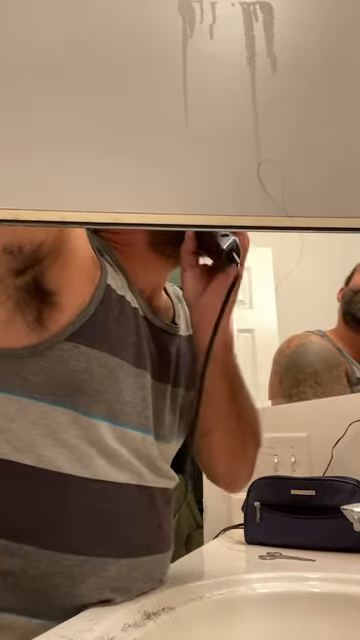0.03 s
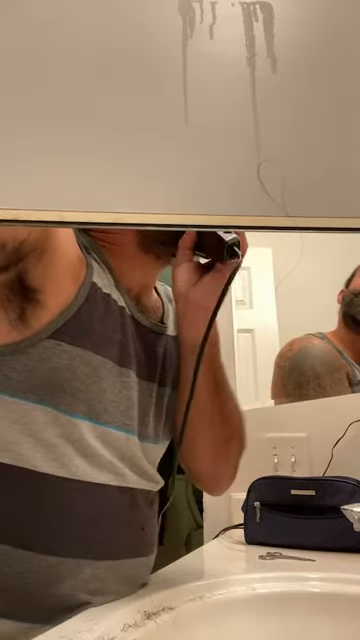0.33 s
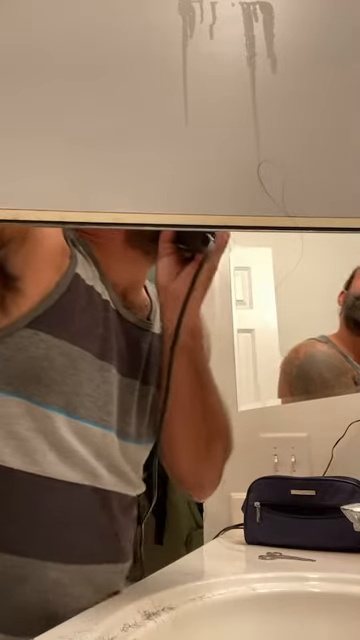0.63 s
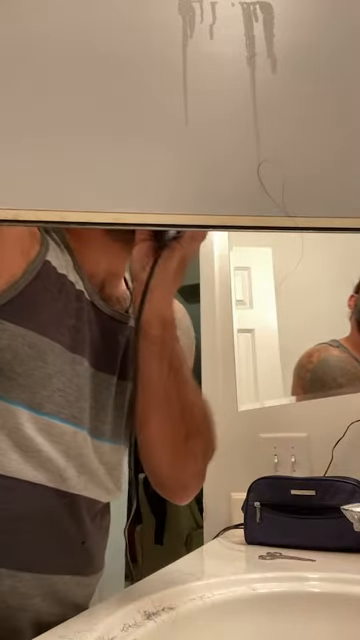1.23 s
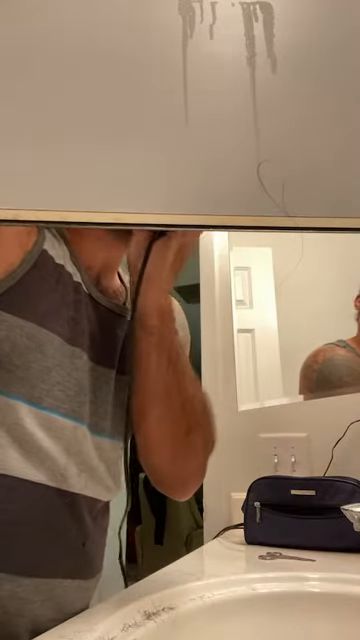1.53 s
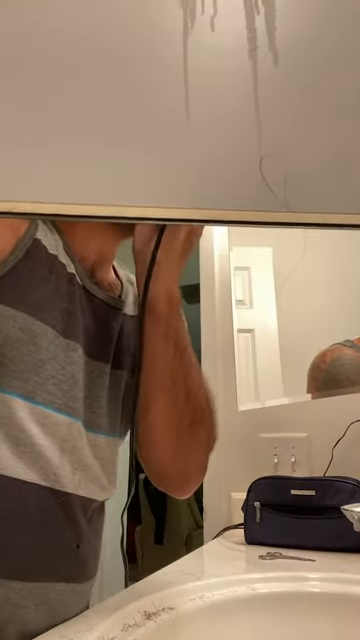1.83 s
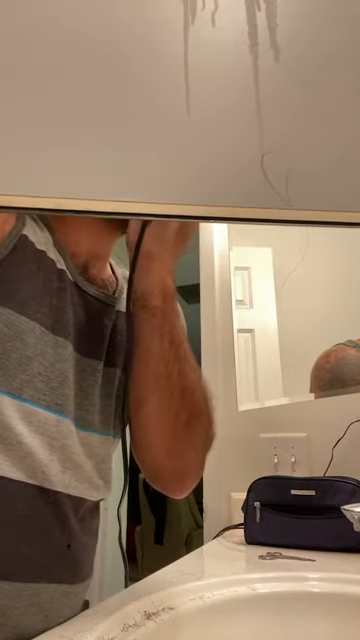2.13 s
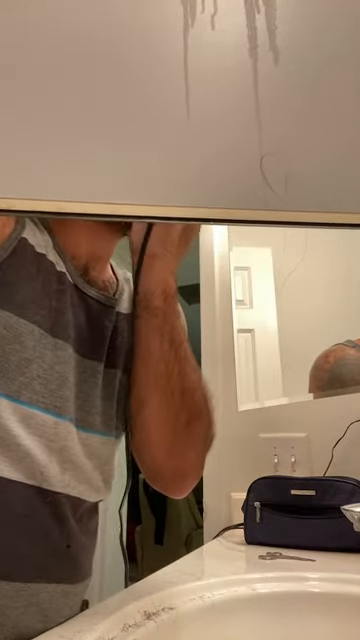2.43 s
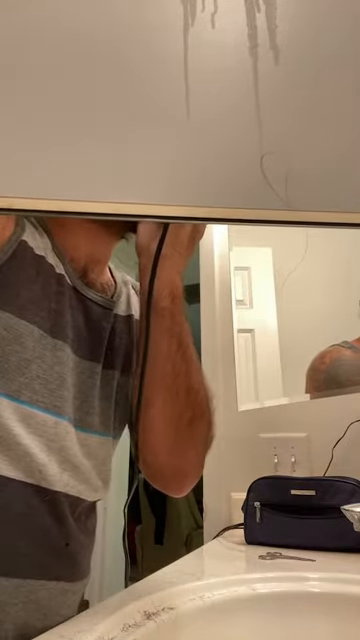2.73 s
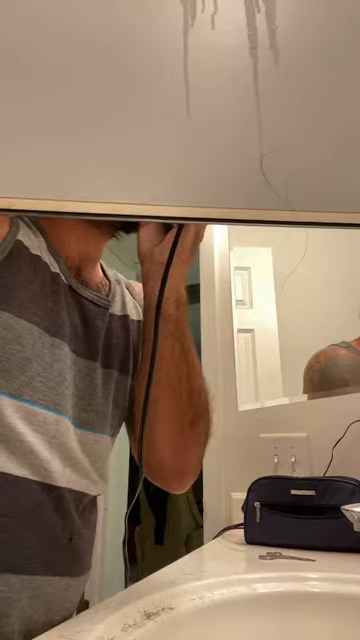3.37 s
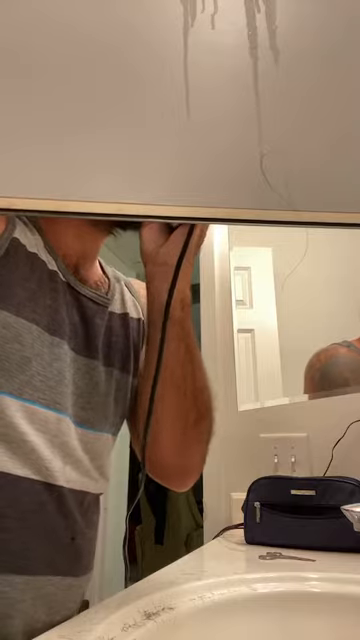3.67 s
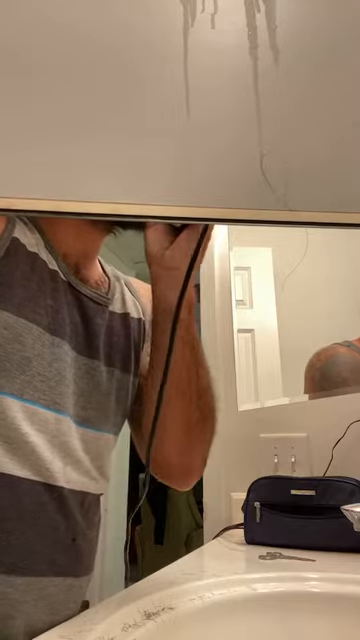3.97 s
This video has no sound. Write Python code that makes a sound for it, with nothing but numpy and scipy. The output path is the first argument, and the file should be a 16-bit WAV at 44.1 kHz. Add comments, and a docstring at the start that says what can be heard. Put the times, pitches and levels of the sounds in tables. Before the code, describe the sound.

An electric beard trimmer buzzes steadily, then crackles through hair in a small bathroom.

```python
"""A corded beard trimmer buzzes in a small tiled bathroom; its armature swings at twice the mains rate
and the blade ticks at both ends of each swing. The tone shifts as the hand brings it from in front of
the face past the chin (0.7 s) and cheek (1.2 s) into the beard (2 s). There the blades snip hairs on
every stroke: a crackle that rings the case and swells at each thick tuft. From about 2.5 s the blades,
pressed on the skin, also sizzle. Faint room rumble and hiss lie under it all."""
import sys
import numpy as np
from scipy import signal
from scipy.fft import rfft, irfft
from scipy.io import wavfile
from scipy.ndimage import map_coordinates

SR = 44100
rng = np.random.default_rng(int(sys.argv[2]) if len(sys.argv) > 2 else 0)


def unload_audio(sound):
    """Save the sound as a 16-bit wav file, at the path given as the first command line argument."""
    columns = np.transpose(np.atleast_2d(sound))
    # keep every value between -1 and 1, then stretch to whole-number steps
    steps = np.round(np.clip(columns, -1, 1) * 32767)
    wavfile.write(sys.argv[1], SR, steps.astype(np.int16))


N = 176400
STROKE_HZ = 119.958

# Tone of the buzz in four places, played from harmonic 3 up: harmonic, level_db
TONE_IN_FRONT = [(1, -6), (2, -36), (3, -19), (4, -23), (5, -18), (6, -26), (7, -31), (8, -23.5), (9, -35),
                 (10, -19.5), (11, -5), (12, -18), (13, -18), (14, -13.5), (15, -15), (16, -11), (17, -6),
                 (18, -19), (19, -16), (20, -6), (21, 0.5), (22, -14), (23, -2.5), (24, -21), (25, -18)]
TONE_AT_CHIN = [(1, -1), (2, -32), (3, -14.5), (4, -20), (5, -12), (6, -18.5), (7, -16), (8, -21.5),
                (9, -10.5), (10, -14), (11, -5), (12, -24), (13, -1), (14, -10), (15, -9.5), (16, -21),
                (17, -8.5), (18, -8), (19, -10.5), (20, -9.5), (21, 0.5), (22, -11), (23, -2.5), (24, -16),
                (25, -17)]
TONE_AT_CHEEK = [(1, -3), (2, -36), (3, -12.5), (4, -23), (5, -12), (6, -21.5), (7, -27), (8, -27),
                 (9, -4.5), (10, -13.5), (11, -6), (12, -19), (13, -2.5), (14, -16.5), (15, -6.5),
                 (16, -19.5), (17, -8.5), (18, -14), (19, -11), (20, -11), (21, 1), (22, -11), (23, -9.5),
                 (24, -17), (25, -7)]
TONE_IN_BEARD = [(1, 0), (2, -17), (3, -16.5), (4, -25.5), (5, -4.5), (6, -21), (7, -19), (8, -22),
                 (9, -2.5), (10, -13.5), (11, -8), (12, -13.5), (13, -7.5), (14, -28.5), (15, -7.5),
                 (16, -19), (17, -14.5), (18, -50), (19, -8), (20, -3.5), (21, -3.5), (22, -9.5),
                 (23, -12.5), (24, -38), (25, -8)]
# Fader for each of those tones: gain_db
TONE_GAINS = [-42, -44, -43, -44.5]
# Path of the hand: time_s, place (0 in front, 1 chin, 2 cheek, 3 beard)
HAND_PATH = [(0, 0.11), (.42, 0), (.65, 1), (.85, 1), (1.15, 2), (1.55, 2), (1.95, 3), (2.6, 2.5), (4, 3)]
# Level ride of the fundamental hum: time_s, level_db
HUM_RIDE = [(0.03, -47.5), (0.39, -45), (1.25, -47), (1.82, -43.5), (2.69, -42.5), (3.17, -44),
            (3.95, -43.5)]
# Swells of the middle and the high harmonics: time_s, gain_db
MID_RIDE = [(0, 2.5), (.3, 1.5), (.62, -1.5), (.95, 2), (1.3, 2.5), (1.7, 0), (2.0, -0.5), (2.4, 2),
            (2.8, 0), (3.3, 3), (3.7, 3.5), (4, 0.5)]
HIGH_RIDE = [(0, 0), (.3, 1.5), (.6, -0.5), (.95, -3), (1.3, 0), (1.8, 1), (2.3, -3), (2.9, 2.5), (3.4, 2),
             (4, -0.5)]
MID_FROM_HZ, HIGH_FROM_HZ = 900, 1900


def armature_buzz(hop=100):
    """The armature hums with clean harmonics that drift with the hand and shake under cutting load."""
    place, mids, highs = (curve(rows)[0][::hop] for rows in (HAND_PATH, MID_RIDE, HIGH_RIDE))
    load = unit(amp(curve(CUTTING_RIDE)[0][::hop]))
    tones = (TONE_IN_FRONT, TONE_AT_CHIN, TONE_AT_CHEEK, TONE_IN_BEARD)
    gains = np.array([amp(np.array(rows)[:, 1] + db) for rows, db in zip(tones, TONE_GAINS)])
    swing, samples = np.exp(2j * np.pi * strokes()), np.arange(N)
    steps, top = len(place), gains.shape[1]
    out = amp(curve(HUM_RIDE)[0]) * swing.imag
    for k in range(3, top + 1):  # the second harmonic is silent
        hz, height = k * STROKE_HZ, k / top  # higher harmonics waver more
        swell_db = highs if hz > HIGH_FROM_HZ else mids if hz > MID_FROM_HZ else 0
        drift_db = 1.45 * np.sqrt(height) * wander(steps, hz=2.82)
        shake_db = 1.5 * height * load * wander(steps, hz=24.91)
        level = np.interp(place, range(4), gains[:, k - 1]) * amp(swell_db + drift_db + shake_db)
        phase_turns = rng.random() + 0.22 * height * wander(steps, hz=1.478)
        envelope = np.interp(samples, samples[::hop], level * np.exp(2j * np.pi * phase_turns))
        out += (envelope * swing ** k).imag
    return np.sqrt(2) * out


# Cutting effort: time_s, rasp_db, ring_db, crackle_db
CUTTING_RIDE = [(0, -51, -54, -47.5), (.25, -54.5, -53, -53), (.5, -65, -66, -51), (1.05, -62, -60, -54.5),
                (1.68, -63, -51, -50), (1.85, -49.5, -47, -43.5), (2.0, -48.5, -50, -39.5),
                (2.2, -42, -44, -45.5), (2.4, -45.5, -38.5, -39), (2.62, -48.5, -44.5, -46),
                (2.85, -46, -42.5, -43.5), (3.0, -45.5, -46, -41), (3.2, -49.5, -49, -42.5),
                (3.3, -44, -38.5, -42), (3.47, -40.5, -49, -39), (3.58, -47.5, -42, -45.5),
                (3.72, -44, -41.5, -43.5), (3.85, -39, -49, -42.5), (4, -37, -38, -43)]
# Tufts caught by the blades: start_s, length_s, crackle_db, ring_db, fizz_db
TUFT_HITS = [(0.146, 0.0098, -40, -55, -46), (0.201, 0.01, -37.5, -55, -43), (1.188, 0.0085, -41, -58, -50),
             (1.768, 0.03, -48, -42, -49), (1.845, .015, -37, -57, -44), (1.869, 0.026, -35, -36, -41),
             (1.995, 0.019, -39.5, -37.5, -53), (2.05, 0.024, -39, -53, -44),
             (2.073, 0.032, -33, -33.5, -54), (2.161, 0.047, -40, -38.5, -47),
             (2.219, 0.022, -36.5, -36.5, -47), (2.293, 0.013, -35, -49, -37.5),
             (2.313, 0.027, -37.5, -54, -58), (2.415, 0.047, -47, -39.5, -52), (2.479, .01, -37, -43, -52),
             (2.521, 0.045, -36.5, -36, -55), (2.65, .02, -34, -37, -45), (2.701, 0.013, -43, -52, -47),
             (2.778, 0.015, -38.5, -39, -54), (2.828, .012, -47, -43, -48),
             (2.935, 0.0098, -30.5, -38, -49), (2.972, 0.028, -39, -35, -46),
             (3.004, 0.012, -33.5, -44, -42), (3.045, 0.009, -33, -25, -58), (3.139, 0.0089, -37, -49, -55),
             (3.238, 0.034, -38, -35.5, -48), (3.296, 0.032, -37, -38, -53),
             (3.393, 0.037, -46, -36.5, -48), (3.436, 0.017, -36, -28.5, -52),
             (3.499, 0.022, -36, -33.5, -56), (3.673, .015, -38, -37.5, -49),
             (3.756, 0.025, -39, -34.5, -62), (3.798, 0.0089, -43, -28, -56), (3.844, 0.016, -34, -29, -59),
             (3.898, 0.034, -38.5, -31.5, -61), (3.964, .012, -44, -34.5, -58)]
# Blades pressed on the skin: time_s, level_db
SIZZLE_RIDE = [(0, -75), (2.4, -59), (2.65, -48.5), (3.2, -51), (3.6, -44), (4, -44)]
# EQ of the low rasp, ringing case, hair crackle, fine fizz and skin sizzle: freq_hz, gain_db
RASP_EQ = [(150, -38.5), (400, -19), (455, -5), (540, -13), (660, 2.5), (770, -10), (870, -5.5),
           (1020, -9.5), (1160, 2), (1500, 3.5), (1800, -2.5), (2150, -6), (3000, -7.5), (4000, -12),
           (8000, -37.5)]
CASE_EQ = [(500, -45.5), (2050, -22.5), (2220, -23), (2320, 3.5), (2460, 4), (2590, -1.5), (2670, -6),
           (2830, -8.5), (3100, -17.5), (6000, -46.5)]
CRACKLE_EQ = [(300, -37), (2500, -9), (3900, -11.5), (4700, -5), (5300, -0.5), (7600, 2.5), (8600, -2),
              (9800, -10), (11800, -13), (13500, -15), (15700, -16.5)]
FIZZ_EQ = [(1000, -40), (6000, -12), (8500, 3), (11300, 8), (13000, -3), (15700, -7)]
SIZZLE_EQ = [(3000, -40), (5500, -14), (6100, 3.5), (6600, -30), (8600, -33), (9050, -2), (9500, -29),
             (12900, -8), (13300, -13), (13600, -15), (14000, -2), (14400, -18), (15700, -17)]


def cutting(attack_s=0.0049, release_s=0.002):
    """Blades rasp and crackle through hair, ring the case and sizzle on skin; tufts add short bursts."""
    t, tufts = np.arange(SR // 8) / SR, np.zeros((3, N + SR))
    for start_s, length_s, *levels_db in TUFT_HITS:
        burst = np.minimum(t / attack_s, 1) * np.exp(-np.maximum(t - length_s, 0) / release_s)
        at = round(start_s * SR)
        tufts[:, at:at + len(t)] += amp(levels_db)[:, None] * burst
    tuft_crackle, tuft_ring, tuft_fizz = tufts[:, :N]
    rasp, ring, crackle = amp(curve(CUTTING_RIDE))
    blades = snips(rasp, RASP_EQ, amp(-8.5) * tuft_ring, stroke_spread_db=2.5)
    blades += snips(crackle, CRACKLE_EQ, tuft_crackle, stroke_spread_db=2)
    blades += snips(tuft_fizz, FIZZ_EQ)
    blades += snips(amp(curve(SIZZLE_RIDE)[0]), SIZZLE_EQ)
    case = snips(ring, CASE_EQ, tuft_ring, stroke_spread_db=1.5)
    blades, case = np.pad([blades, case], ((0, 0), (0, SR // 2)))  # space for the reverb tail
    return (bathroom(blades, wet_db=-2) + bathroom(case, wet_db=2))[:N]


def snips(level, eq, tuft=0, stroke_spread_db=0, clicks_per_s=9000, click_spread_db=2.5):
    """Tiny clicks of parting hairs, loudest where the blades close; strokes can differ in strength."""
    turns = strokes() - 0.56 + 1  # the blades close 0.56 of the way through a stroke
    closing = 0.53 + np.exp(-(turns % 1) / 0.38)
    strength = unit(amp(stroke_spread_db * rng.standard_normal(1024)))[turns.astype(int)]
    clicks = (rng.random(N) < clicks_per_s / SR) * rng.choice([-1, 1], N)
    clicks = clicks * amp(click_spread_db * rng.standard_normal(N))
    return colour(np.hypot(level * strength, tuft) * unit(clicks * closing), eq)


# Bright EQ of the blade ticks: freq_hz, gain_db
TICK_EQ = [(200, -49), (2700, -34.5), (3150, 1.5), (4200, -4.5), (5600, -5.5), (6600, -3.5), (7200, 4),
           (8000, 3), (8800, -4), (10000, -10.5), (13700, -10.5), (15700, -19)]
# Level ride of the ticks: time_s, level_db
TICK_RIDE = [(0, -46), (.45, -42.5), (.8, -41.5), (1, -43), (1.25, -46.5), (1.6, -43), (2, -48), (3, -46),
             (4, -49.5)]


def blade_ticks(jitter_s=6e-6, spread_db=1.3, spots=11):
    """The blade ticks at both ends of its swing; the echoes change as the hand moves."""
    train, window = np.zeros(N), np.arange(-16, 17)
    cycles = np.arange(round(STROKE_HZ * N / SR))[:, None]
    for phase_turns, db in ((0.55, 0), (0.93, -3.5)):  # out, then back
        at = (cycles + phase_turns) * SR / STROKE_HZ + jitter_s * SR * rng.standard_normal(cycles.shape)
        index = at.astype(int) + window
        strength = amp(db + spread_db * rng.standard_normal(at.shape))
        train[index % N] += strength * np.sinc(index - at) * np.hanning(len(window))
    train = colour(train, TICK_EQ)
    position, out = np.linspace(0, spots - 1, N), np.zeros(N)
    for spot in range(spots):  # a fresh reverb for each spot the hand passes
        crossfade = np.sqrt(np.maximum(1 - abs(position - spot), 0))
        out += crossfade * unit(bathroom(train, wet_db=4.5))
    return amp(curve(TICK_RIDE)[0]) * unit(near_echoes(out))


# Early reflections of the ticks: delay_ms, gain_db
NEAR_SURFACES = [(0.698, -5), (1.298, -10), (2.1, -2.5), (2.999, -4.5)]


def near_echoes(x, sway_ms=0.097):
    """Face, hand and mirror add echoes whose paths change as the hand sways."""
    samples, out = np.arange(N), x.copy()
    for delay_ms, db in NEAR_SURFACES:
        sway = np.interp(samples, np.linspace(0, N, 1000), wander(1000, hz=2.194))
        lag = (delay_ms + sway_ms * sway) * SR / 1000
        out += amp(db) * np.interp(samples - lag, samples, x)
    return out


def bathroom(x, wet_db, low_t60_s=0.2, high_t60_s=0.34, split_hz=3900):
    """Direct sound plus a dense tail off the tiles, at unchanged power; the tail wraps round the end."""
    t, hz = np.arange(SR // 3) / SR, np.fft.rfftfreq(SR // 3, 1 / SR)
    noise = rng.standard_normal(len(t))
    low = irfft(rfft(noise) / (1 + (hz / split_hz) ** 2), len(t))
    tail = low * amp(-60 * t / low_t60_s) + (noise - low) * amp(-60 * t / high_t60_s)
    tail *= t > 0.002  # pre-delay
    taps = amp(wet_db) * tail / np.linalg.norm(tail)
    taps[0] = 1
    return irfft(rfft(x) * rfft(taps / np.linalg.norm(taps), len(x)), len(x))


# EQ of the room tone: freq_hz, gain_db
ROOM_TONE_EQ = [(20, -32), (32, -18), (42, 1), (60, -2), (72, -12), (130, -10), (210, -16.5), (500, -22),
                (1500, -24), (5000, -26.5), (15000, -50)]


def room_tone(level_db=-58.5):
    """Faint low rumble and hiss of the room."""
    gain = eq_gain(ROOM_TONE_EQ, np.fft.rfftfreq(N, 1 / SR))
    return amp(level_db) * unit(irfft(rfft(rng.standard_normal(N)) * gain, N))


def strokes():
    """Running count of armature strokes, sample by sample."""
    return STROKE_HZ * np.arange(N) / SR


def amp(db):
    """Decibels to gain."""
    return 10 ** (np.asarray(db) / 20)


def unit(x):
    """Scales to rms 1."""
    return x / np.sqrt(np.mean(x ** 2) + 1e-20)


def curve(rows):
    """Each column of an automation table, sample by sample."""
    time_s, *columns = np.transpose(rows)
    return [np.interp(np.arange(N) / SR, time_s, column) for column in columns]


def eq_gain(eq, hz):
    """Gain of an EQ curve drawn on a log-frequency axis."""
    freq_hz, gain_db = np.transpose(eq)
    return amp(np.interp(np.log(hz + 1), np.log(freq_hz + 1), gain_db))


def colour(x, eq, size=4096):
    """Applies an EQ curve as a minimum-phase filter of unit energy."""
    log_gain = np.log(eq_gain(eq, abs(np.fft.fftfreq(size, 1 / SR))))
    taps = np.fft.ifft(np.exp(signal.hilbert(log_gain).conj())).real[:size // 2]
    return signal.oaconvolve(x, taps / np.linalg.norm(taps))[:len(x)]


def wander(steps, hz):
    """Smooth random motion, rms near 1, that changes about hz times a second."""
    positions = np.linspace(0, hz * N / SR, steps)
    return map_coordinates(rng.standard_normal(512), [positions], order=3, mode="mirror")


def scene():
    """The trimmer in the bathroom, in mono."""
    return (armature_buzz() + blade_ticks() + cutting() + room_tone())[None]


def record(dry):
    """A steep high cut at 15.72 kHz."""
    high_cut = signal.firwin(711, 15720, window=("kaiser", 9), fs=SR)
    return signal.oaconvolve(dry, high_cut[None], "same")


dry = scene()
out = record(dry)
unload_audio(out)
```